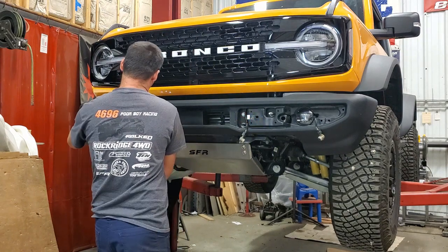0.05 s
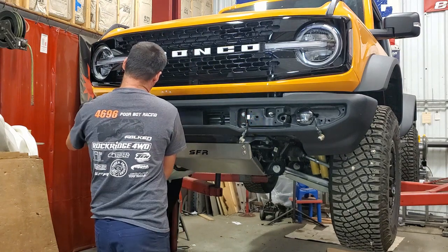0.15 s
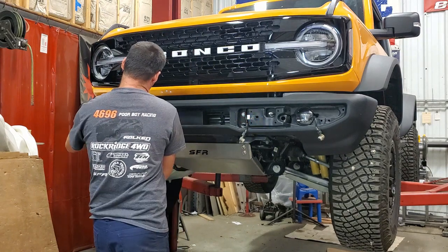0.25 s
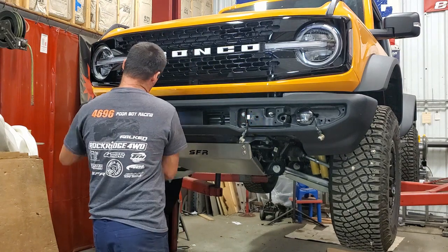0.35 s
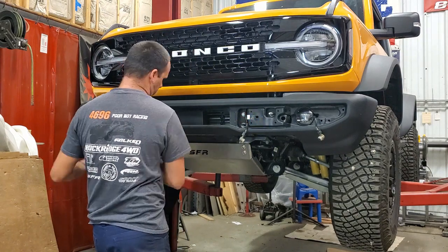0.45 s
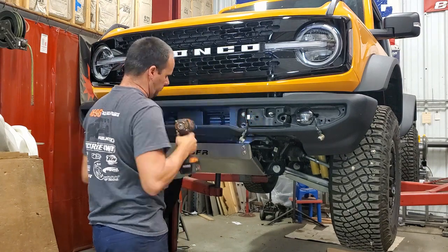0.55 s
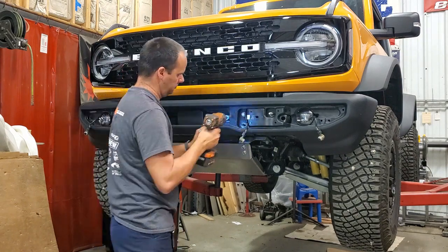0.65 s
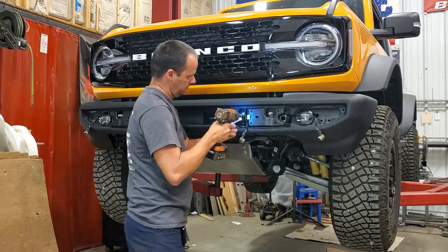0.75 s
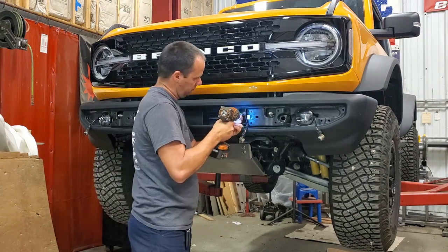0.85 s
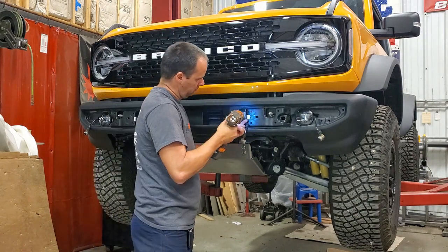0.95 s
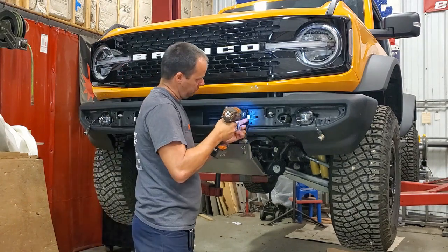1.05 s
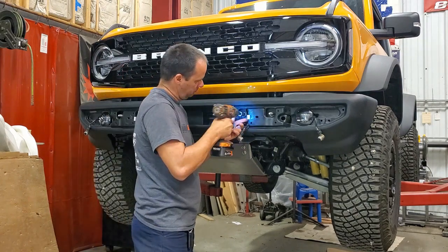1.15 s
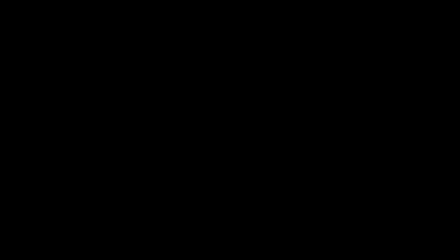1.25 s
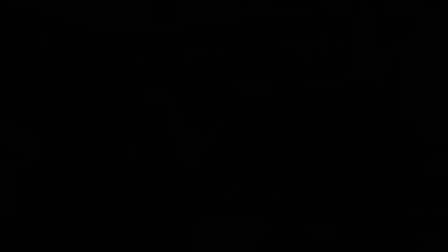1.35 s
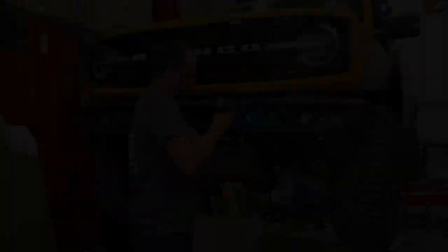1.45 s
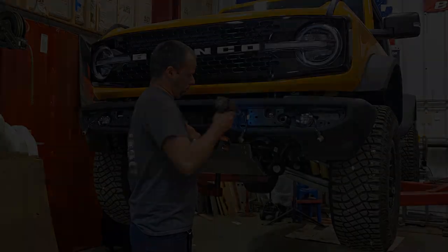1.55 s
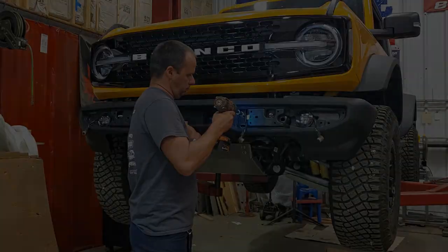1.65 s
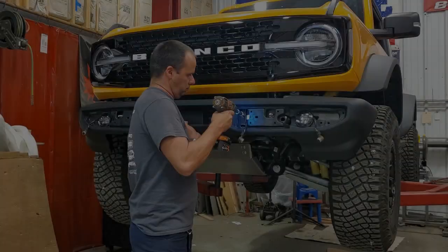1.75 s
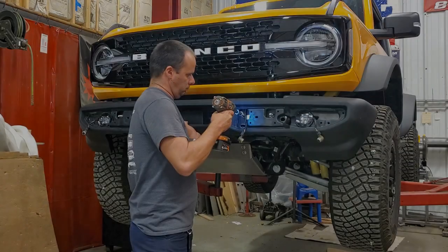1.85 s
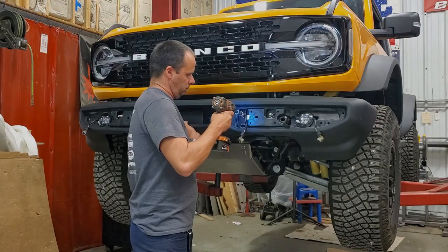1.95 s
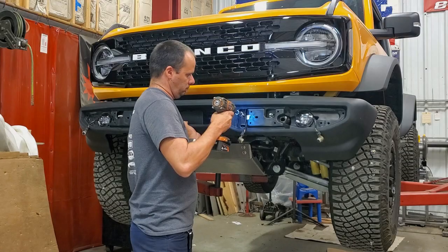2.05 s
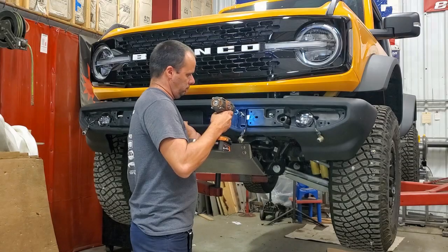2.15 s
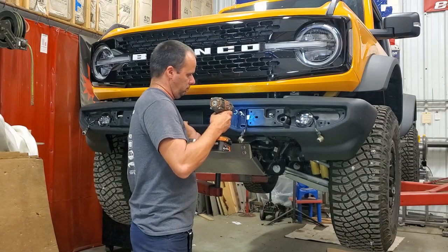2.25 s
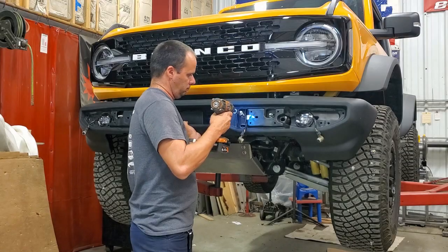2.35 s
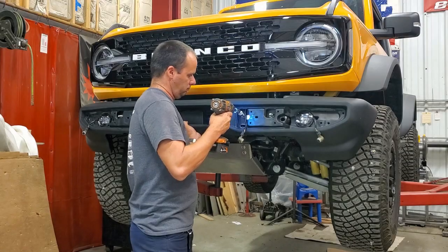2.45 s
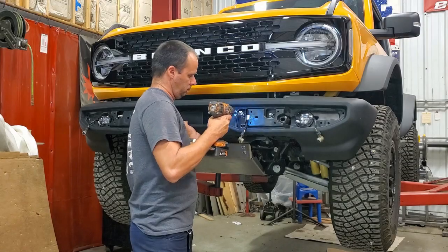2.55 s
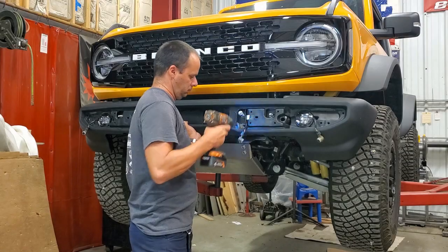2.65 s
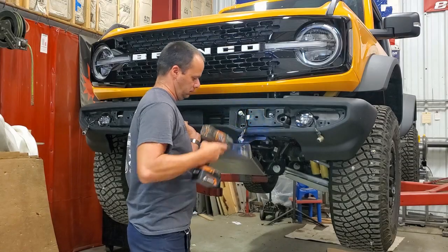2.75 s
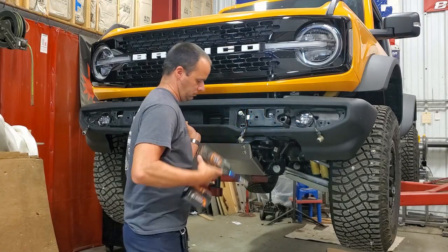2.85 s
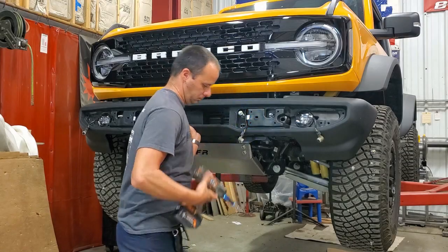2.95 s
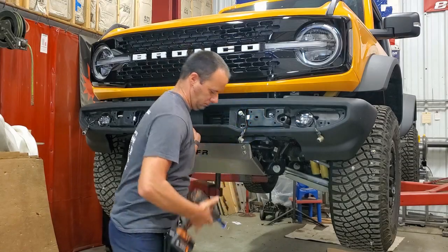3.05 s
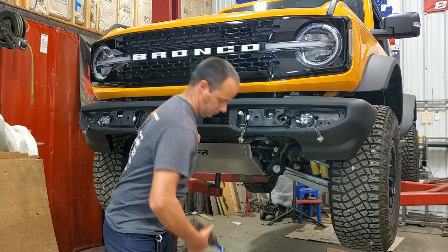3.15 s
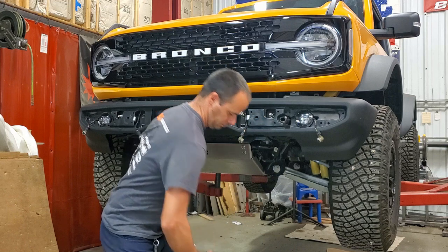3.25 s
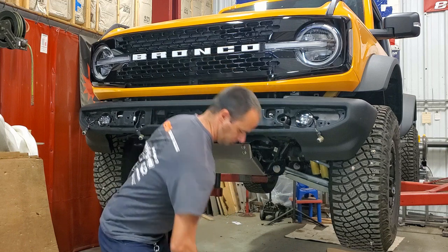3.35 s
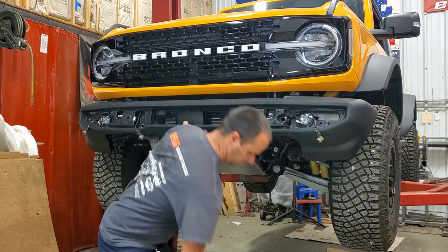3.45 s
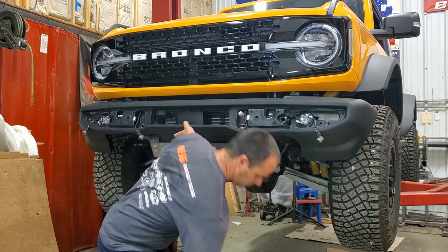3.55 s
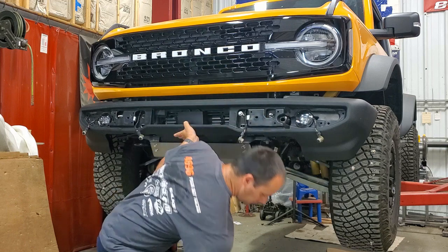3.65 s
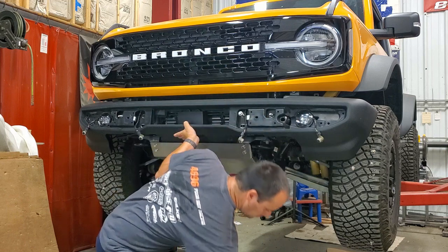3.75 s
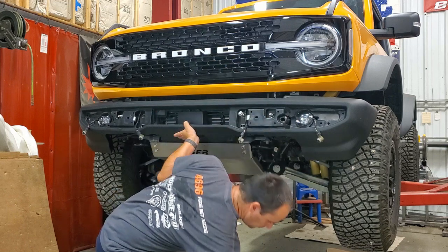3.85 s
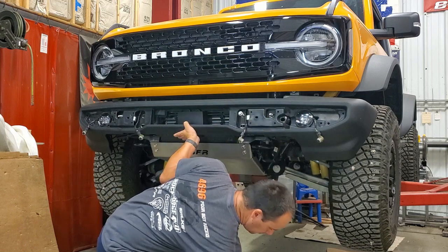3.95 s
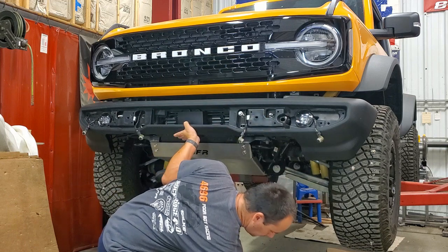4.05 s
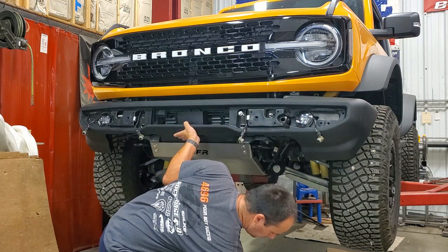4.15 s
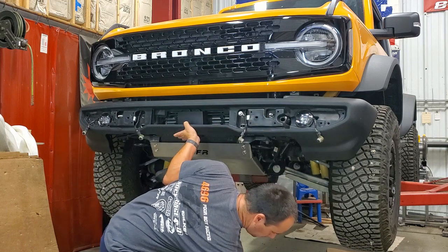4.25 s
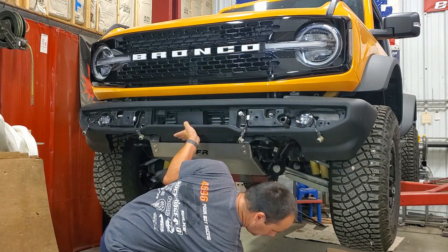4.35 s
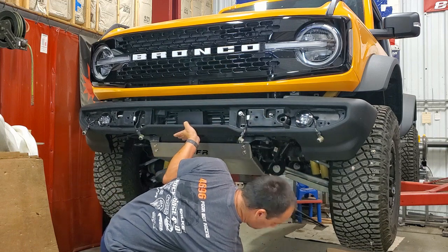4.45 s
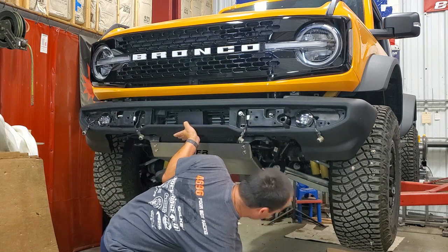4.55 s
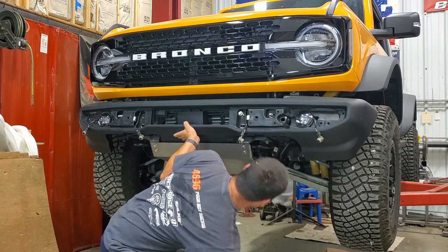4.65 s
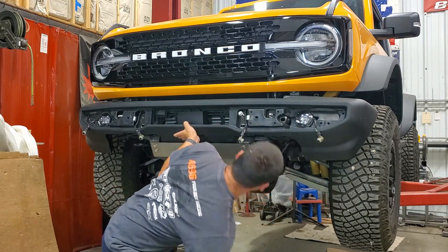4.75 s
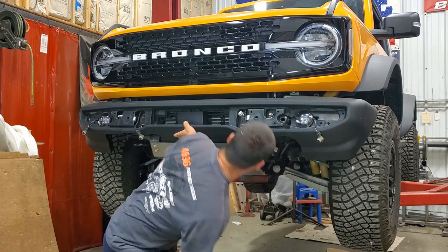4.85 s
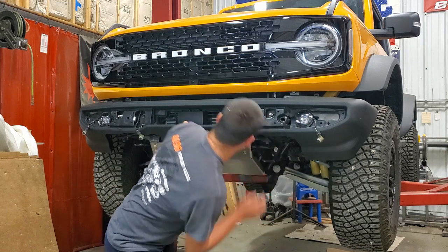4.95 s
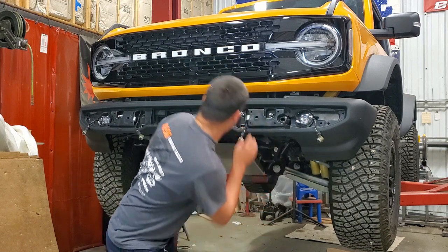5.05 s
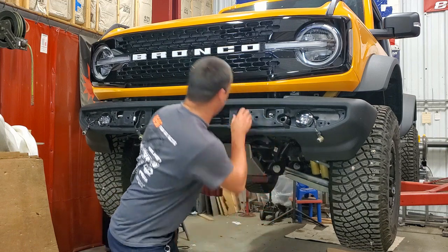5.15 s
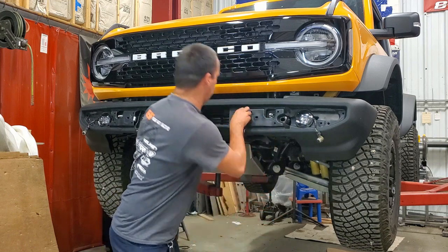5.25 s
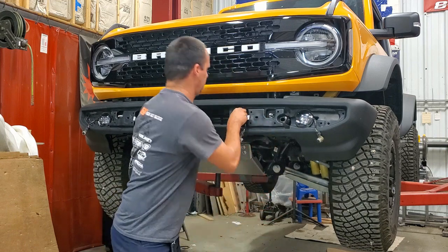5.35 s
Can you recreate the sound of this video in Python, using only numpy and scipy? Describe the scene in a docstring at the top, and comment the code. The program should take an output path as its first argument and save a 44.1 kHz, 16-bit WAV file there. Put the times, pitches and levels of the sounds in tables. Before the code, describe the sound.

Faint sped-up hisses and ticks, a brief silence, then a cordless driver whirs up, rattles, winds down with knocks, and is set down with a clank.

```python
"""A reverberant workshop in stereo: a cordless driver spins a bolt out of a truck bumper.
First comes fast-forwarded work, with noise swells as shrill hisses and contact showers as ticks, then a short
silence. Then the motor creeps, winds up and coasts down: sines whine with the gear speed, random contacts
rattle in metal resonances, and the loose bolt knocks. Something scrapes, and the tool is set down on the floor.
The room follows close on the direct sound; its echo differs between left and right."""
import sys
import numpy as np
from scipy import signal
from scipy.fft import rfft, irfft
from scipy.io import wavfile
from scipy.ndimage import uniform_filter1d

SR = 44100
rng = np.random.default_rng(int(sys.argv[2]) if len(sys.argv) > 2 else 0)


def dump_mix(stems):
    """Bounce the given channels to the path in sys.argv[1] as a 16-bit WAV at rate SR."""
    frames = np.atleast_2d(stems).T  # one column per channel
    limited = np.clip(frames, -1, 1)  # hard clip at full scale
    pcm = np.round(limited * 32767).astype(np.int16)
    wavfile.write(sys.argv[1], SR, pcm)


N = 238404
TIME = np.arange(N) / SR

# Levels are at the source, ahead of its colouring and the room.
# Colours are spectral shapes; colour() scales each to unit power.
FAST_END_S, SHOP_START_S = 1.231, 1.295  # silence in between

# fast-forwarded tool runs: start/s, swell/s, end/s, level/dB
FAST_RUNS = [(-.01, 0.0077, 0.024, -35), (0.094, 0.06, 0.17, -34), (.2, .02, .25, -59.5),
             (.249, .005, .305, -45), (.27, 0.057, 0.4, -40.5)]
FAST_FALL_DB_PER_S = 500
# faint handling between the ticks
FIDGET_S, FIDGET_DB, FIDGET_FADE_DB_PER_S = 0.606, -68.5, 30
# colour of the runs and handling: f/Hz, level/dB
FAST_COLOUR = [(240, -36), (400, -15.5), (504, -12), (676, -1), (789, -5), (1270, -1.5), (1440, -8),
               (1990, -3.5), (4580, -8.5), (13900, 1.5), (16000, -5.5)]
# fast-forwarded clatter, the loudest ticks: t/s, level/dB, treble/dB
FAST_TICKS = [(0.656, -57, 10), (.699, -55, -3), (0.798, -57, 21), (0.827, -48.5, -3), (0.847, -52.5, -22),
              (.929, -53.5, -21.5), (1.029, -57, -13), (1.093, -48.5, -10), (1.149, -50, -14),
              (1.198, -48, -20.5)]
FAST_TICK_T60_S = 0.15
# colour of the ticks: f/Hz, level/dB
FAST_TICK_COLOUR = [(530, -17), (900, -4), (1020, -4.5), (1550, -10), (1850, -2), (2170, -9.5),
                    (2600, -1.5), (3300, -9), (5160, -8), (5610, -6.5), (14200, 1.5), (16000, -6.5)]
# colour of the hum under the fast work: f/Hz, level/dB
FAST_HUM_COLOUR = [(30, -35.5), (90, -28), (130, -12), (180, -4.5), (280, 1), (400, -3), (540, -15),
                   (720, -17), (1400, -30), (2500, -38), (4500, -44)]
# course of that hum: t/s, level/dB
FAST_HUM_LEVEL = [(0, -66), (.18, -64), (.28, -54.5), (.42, -52), (.55, -57), (1.23, -56.5)]
# strikes of a bright clink: t/s, level/dB, T60/s, treble/dB
CLINK_BLOWS = [(.389, -33.5, .1, 0), (.396, -22, 0.1, 0), (.42, -46.5, 0.2, 0)]
# its ringing metal: f/Hz, width/Hz, gain/dB
CLINK_MODES = [(5920, 300, -8.5), (8500, 330, -5), (11250, 210, 6.5), (12000, 500, 0.5), (13640, 600, 0.5),
               (14140, 3700, -14)]

# low air rumble of the building: f/Hz, level/dB
RUMBLE_COLOUR = [(20, -30.5), (30, -18), (44, -9.5), (56, 4.5), (66, -2), (82, -9.5), (110, -17),
                 (150, -24.5), (240, -30), (360, -35.5), (500, -45.5), (800, -49.5), (2000, -58.5),
                 (16000, -70)]
# course of the rumble: t/s, level/dB
RUMBLE_LEVEL = [(1.3, -51), (2.2, -53.5), (2.85, -59), (4.45, -52.5), (5.4, -51)]
# colour of the faint hiss above it: f/Hz, level/dB
HISS_COLOUR = [(500, 4), (3000, -2.5), (6500, -1), (7500, -13), (11000, -2.5), (16000, -2)]

# speed control whistling at half trigger: start/s, swell/s, end/s, level/dB
WHISTLES = [(1.285, .01, 1.375, -44.5), (1.37, .02, 1.44, -53.5), (1.443, .012, 1.497, -42)]
WHISTLE_HZ, WHISTLE_FALL_DB_PER_S = 5810, 702

# trigger half pressed, pulled through, let go; at last the bolt's thread brakes the motor
PULL_S, LET_GO_S, BRAKE_S, STOP_S = 1.507, 1.745, 2.05, 2.38
CREEP_HZ, FULL_HZ = 1792, 5319  # nominal gear whine at half trigger and at full speed
SPIN_UP_S, COAST_S = .065, .72  # time constants of the rotor
TEETH = 16  # on the pinion
WHINE_DB, WHINE_DB_PER_DECADE = -31.5, 37.5  # at full speed; growth with speed
RATTLE_DB, RATTLE_DB_PER_DECADE = -23.5, 22  # likewise
JOLT_DB, JOLT_S = 7, 0.048  # extra rattle as the socket takes up the load; time constant
SURGE_DB, SURGE_TREBLE_DB = 5, 5  # scaled by torque: extra level in spin-up, extra sizzle
# gear and socket clatter: f/Hz, level/dB
RATTLE_COLOUR = [(90, -40), (150, -15), (190, -6.5), (300, -1), (400, -15), (500, -7.5), (1100, -8),
                 (2060, -5), (3300, -5.5), (4500, -12), (5600, -15.5), (6700, -15), (7500, -27),
                 (11000, -19), (16000, -24)]
# bumper and tool body: f/Hz, width/Hz, gain/dB
BODY_MODES = [(187, 21, 0), (283, 21, -1), (494.7, 26, 1.5), (658.7, 50, -5), (820, 33, -13),
              (1305, 66, -7.5), (1600, 87, -5), (2030, 66, -2.5), (2542, 26, -3), (3360, 350, -7.5)]
# gear housing, rung as the whine sweeps through: f/Hz, width/Hz, gain/dB
HOUSING_MODES = [(3700, 270, 1), (4190, 90, -1), (5036, 38, -0.5)]

# loose bolt jumping its last thread: t/s, level/dB, treble/dB
KNOCKS = [(2.009, -14.5, 4.5), (2.029, -21.5, -1), (2.045, -17.5, -3), (2.079, -14.5, -5),
          (2.117, -14.5, -0.5), (2.16, -17, -2.5), (2.207, -15.3, -1), (2.251, -18, 0.5), (2.296, -28, 15)]
KNOCK_T60_S = 0.076
# colour of the knocks: f/Hz, level/dB
KNOCK_COLOUR = [(71, -44.5), (120, -21), (188, -1), (290, -6), (390, -11.5), (493, -5), (557, -6.5),
                (1120, -10.5), (1290, -8.5), (3740, -11.5), (7350, -25), (12500, -24.5), (16000, -30)]

# hollow bumps of the tool's battery and the work: t/s, level/dB, T60/s
BUMPS = [(2.393, -35, .1), (2.428, -31, 0.16), (2.948, -61, .2), (3.461, -48.5, 0.08), (4.176, -28, 0.084),
         (4.237, -20, 0.036)]
# hollow ring of the plastic battery pack: f/Hz, width/Hz, gain/dB
BATTERY_MODES = [(96, 81, 1.5), (484, 180, -10.5), (628, 108, 6), (816, 200, -19)]

# tiny bright clicks: t/s, level/dB
CLICKS = [(2.241, -34), (3.086, -54.5), (4.176, -49), (4.249, -46), (4.318, -52.5), (4.445, -51)]
CLICK_T60_S = 0.03
# colour of the clicks: f/Hz, level/dB
CLICK_COLOUR = [(3000, -25), (6000, -2), (11000, 8), (16000, 1)]
# small metal taps, then the tool set down: t/s, level/dB, treble/dB
TAPS = [(2.876, -72, 4), (3.372, -52, 15), (3.397, -46, 14), (3.425, -56, -9), (4.170, -24.5, 4),
        (4.1745, -22, 6.5)]
TAP_T60_S = 0.016
# colour of taps and bounces: f/Hz, level/dB
TAP_COLOUR = [(35, -55), (60, 8), (108, 2.5), (238, -13.5), (417, -2), (666, -17), (862, -14), (946, -14),
              (1040, -3.5), (1470, -1), (1580, -7), (2520, 1), (7750, -28), (13000, -27), (16000, -28)]
# things slid about: start/s, swell/s, end/s, level/dB, treble/dB
SCRAPES = [(3.089, 0.041, 3.173, -46, -11.5), (3.08, 0.032, 3.224, -52.5, 6), (3.5, 0.043, 3.45, -74, 8),
           (3.2, 0.037, 4.0, -85.5, 12), (3.6, 0.13, 3.73, -71.5, 14.5)]
SCRAPE_FALL_DB_PER_S = 450
# colour of the scrapes: f/Hz, level/dB
SCRAPE_COLOUR = [(120, -47), (200, -19.5), (448, -7.5), (509, -5.5), (806, -7), (1140, -7), (1300, -4),
                 (2290, -6.5), (2510, -5.5), (5940, -11), (7410, -19.5), (11700, -19.5), (16000, -27)]
# soft squeak: t/s, level/dB, T60/s, treble/dB
SQUEAK_BLOWS = [(4.125, -53.5, 0.17, 0)]
# its resonance: f/Hz, width/Hz, gain/dB
SQUEAK_MODES = [(2170, 520, 0.0018)]
# the socket landing: t/s, level/dB, T60/s, treble/dB
CLANK_BLOWS = [(4.1748, -14, 0.014, 0)]
# its metal: f/Hz, width/Hz, gain/dB
CLANK_MODES = [(1520, 64, -1), (2600, 68, -1), (3060, 150, -17), (3850, 300, -3), (4140, 220, -5.5)]
# the tool rocks to rest in ever weaker, brighter bounces
BOUNCE_S, BOUNCE_GAP_S, BOUNCE_T60_S = 4.182, .023, .11
BOUNCE_DB, BOUNCE_LOSS_DB = -36.5, 3.0  # first bounce; loss with each further one
BOUNCE_TREBLE_DB, BOUNCE_BRIGHTER_DB = 5, 2  # first bounce; gain with each further one

# decay of the room: f/Hz, T60/s
SHOP_T60 = [(100, .6), (500, 0.36), (2000, 0.43), (5000, 0.61), (14000, 0.35)]
# left-right correlation of the room: f/Hz, correlation
LIKENESS = [(100, 1), (300, .9), (600, 1), (1200, 0), (2500, 0.26), (5000, 0.079), (14000, 0)]
# stereo balance of the shop's sources: f/Hz, left minus right/dB
BALANCE = [(60, -2.5), (500, 1.5), (2000, 4), (5000, 0.5), (6800, 6), (8500, 5.5), (15000, 13.5)]
CUTOFF_HZ = 15900


def from_db(db):
    """Decibels to gain."""
    return 10 ** (np.asarray(db) / 20)


def rms_one(x):
    """Scale to rms 1."""
    return x / np.sqrt(np.mean(x ** 2) + 1e-20)


def in_time(rows):
    """Each column of a curve, sample by sample."""
    s, *columns = np.transpose(rows)
    return [np.interp(TIME, s, column) for column in columns]


def at_hz(points, hz):
    """Read a table on a log-frequency axis."""
    table_hz, values = np.transpose(points)
    return np.interp(np.log(hz + 1e-9), np.log(table_hz), values)


def convolve(x, response):
    """Pass a sound through an impulse response."""
    return signal.fftconvolve(np.atleast_2d(x), np.atleast_2d(response), axes=1)[:, :N]


def colour(x, spectrum, size=8192):
    """Causal minimum-phase filter of the given spectral shape; white noise keeps its power."""
    gain = from_db(at_hz(spectrum, np.linspace(0, SR / 2, size // 2 + 1)))
    cepstrum = irfft(np.log(rms_one(gain)))[:size // 2]
    cepstrum[1:] *= 2  # fold onto positive time: minimum phase
    return convolve(x, irfft(np.exp(rfft(cepstrum, size))))


def resonate(x, modes):
    """Parallel resonances, each with its dB as the gain at its peak."""
    out = 0
    for hz, width, db in modes:
        b, a = signal.iirpeak(hz, hz / width, fs=SR)
        out = out + from_db(db) * signal.lfilter(b, a, x + 1e-18)
    return out


def tilt(x, treble_db, split_hz=1800):
    """See-saw the treble against the bass."""
    b, a = signal.butter(1, split_hz, fs=SR)
    bass = signal.lfilter(b, a, x + 1e-18)
    return bass * from_db(-treble_db / 2) + (x - bass) * from_db(treble_db / 2)


def waver(size):
    """Noise smoothed over size samples; rms 1."""
    return rms_one(uniform_filter1d(rng.standard_normal(N), size=size))


def grains(per_s, spread_db):
    """Random tiny contacts of uneven size; rms 1."""
    size_db = spread_db * np.clip(rng.standard_normal(N), -2, 2)
    sizes = from_db(size_db) * rng.choice([-1, 1], N)
    return rms_one(sizes * (rng.random(N) < per_s / SR))


def blows(rows, per_s, spread_db, rise_s=0.00022):
    """Each blow is a shower of contacts, rising 20 dB per rise_s and dying 60 dB in its T60."""
    shower, out = grains(per_s, spread_db), 0
    for s, db, t60, treble_db in rows:
        fall_db = np.maximum(60 * (TIME - s) / t60, 20 * (s - TIME) / rise_s)
        out = out + tilt(shower * from_db(db - np.minimum(fall_db, 200)), treble_db)
    return out


def stroke(start, swell_s, end, db, fall_db_per_s):
    """Gain that swells smoothly from its start and falls at a steady dB rate from its end."""
    progress = np.clip((TIME - start) / max(swell_s, 1e-4), 0, 1)
    swell = np.sin(np.pi / 2 * progress) ** 2
    return swell * from_db(db - np.clip(fall_db_per_s * (TIME - end), 0, 200))


def pair(mid, side, alike):
    """Two unrelated signals of equal power become left and right with a given correlation."""
    alike = np.clip(alike, -1, 1)
    return np.sqrt((1 + alike) / 2) * mid + np.sqrt((1 - alike) / 2) * side * np.array([[1], [-1]])


def fast_forward():
    """Sped-up work: tool runs become hisses, clatter becomes ticks, the shop's rumble a hum."""
    runs = [stroke(*run, FAST_FALL_DB_PER_S) for run in FAST_RUNS]
    fidget = stroke(FIDGET_S, .02, FIDGET_S, FIDGET_DB, FIDGET_FADE_DB_PER_S)
    fidget = fidget * from_db(4.7 * waver(size=900))
    level = np.linalg.norm(runs + [fidget], axis=0)
    tick_rows = [(s, db, FAST_TICK_T60_S, treble_db) for s, db, treble_db in FAST_TICKS]

    def hiss_and_ticks():
        """One independent channel of noise swells and contact showers."""
        hiss = colour(level * grains(20000, 4.07), FAST_COLOUR)
        return hiss + colour(blows(tick_rows, 9000, 6.0, rise_s=0.0052), FAST_TICK_COLOUR)

    mid, side = hiss_and_ticks(), hiss_and_ticks()
    clink = resonate(blows(CLINK_BLOWS, 17000, 2.2, rise_s=0.0027), CLINK_MODES)
    hum = from_db(in_time(FAST_HUM_LEVEL)[0]) * colour(rng.standard_normal(N), FAST_HUM_COLOUR)
    width = resonate(side, [(4420, 3300, 2.6)])  # stereo width centres on one broad band
    return (pair(mid, width, 0.38) + clink + hum) * from_db([[1.3], [-1.3]])


def whistle():
    """The motor's windings sing at the switching rate of the speed control: a wavering sine."""
    level = sum(stroke(*row, WHISTLE_FALL_DB_PER_S) for row in WHISTLES)
    return level * from_db(2.0 * waver(size=300)) * np.sin(2 * np.pi * WHISTLE_HZ * TIME)


def rumble():
    """Low air rumble of the building, nearly alike left and right, under a faint wide hiss."""
    mid, side = rng.standard_normal((2, N))
    hiss = from_db(-78) * colour(rng.standard_normal((2, N)), HISS_COLOUR)
    low = from_db(in_time(RUMBLE_LEVEL)[0]) * colour(pair(mid, side, 0.91), RUMBLE_COLOUR)
    return low * from_db([[1.1], [-1.1]]) + hiss


def motor_speed():
    """Share of full speed: the rotor creeps, spins up, coasts and is braked to a stop."""
    pulled_s = np.clip(TIME, PULL_S, LET_GO_S) - PULL_S
    driven = 1 - (1 - CREEP_HZ / FULL_HZ) * np.exp(-pulled_s / SPIN_UP_S)
    coasting = np.exp(-np.maximum(TIME - LET_GO_S, 0) / COAST_S)
    braking = np.clip((STOP_S - TIME) / (STOP_S - BRAKE_S), 1e-6, 1)
    return driven * coasting * braking


def driver():
    """Rotor hum, gear-tooth whine and clatter in step with each turn; whine and clatter grow with speed."""
    speed = motor_speed()
    torque = (1 - speed) * (TIME < LET_GO_S)
    surge_db = SURGE_DB * uniform_filter1d(torque * (TIME > PULL_S), size=1500)
    jolt_db = JOLT_DB * np.exp(-np.maximum(TIME - SHOP_START_S, 0) / JOLT_S)
    whine_db = WHINE_DB + WHINE_DB_PER_DECADE * np.log10(speed) + surge_db
    rattle_db = RATTLE_DB + RATTLE_DB_PER_DECADE * np.log10(speed) + jolt_db + surge_db

    mesh_hz = FULL_HZ * speed * (1 + .005 * waver(size=100))
    turns = np.cumsum(mesh_hz) / (TEETH * SR)
    angle = 2 * np.pi * turns
    # a slightly eccentric pinion puts a faint line on either side of the whine
    mesh = np.sin(TEETH * angle) * (1 + 0.26 * np.sin(angle))
    mesh = mesh + from_db(-26) * np.sin(2 * TEETH * angle)
    rotor_hum = from_db(-9.5) * np.sin(angle)
    whine = (mesh + rotor_hum) * from_db(whine_db + 2.5 * waver(size=450))

    # one slap per turn, of random sign
    slaps = rms_one(np.diff(np.floor(turns), prepend=0) * rng.choice([-1, 1], N))
    clatter = grains(10000, 2.5) * (1 + 0.51 * np.sin(angle))
    contacts = from_db(rattle_db) * (0.81 * clatter + 0.22 * slaps)
    # faster parts hit harder, so the clatter brightens with speed; gears under torque sizzle
    contacts = tilt(contacts, treble_db=10.0 * (speed - 0.83), split_hz=1800)
    contacts = tilt(contacts, treble_db=SURGE_TREBLE_DB * torque, split_hz=5000)
    rattle = colour(contacts, RATTLE_COLOUR) + from_db(1.5) * resonate(contacts, BODY_MODES)
    return from_db(-2.0) * rattle, whine + resonate(whine, HOUSING_MODES)


def bolt():
    """The free bolt knocks on the bumper: short contact showers ring the metal body."""
    rows = [(s, db, KNOCK_T60_S, treble_db) for s, db, treble_db in KNOCKS]
    knocks = blows(rows, 9000, 1.4, rise_s=0.00061)
    return from_db(-4.5) * colour(knocks, KNOCK_COLOUR) + from_db(3.0) * resonate(knocks, BODY_MODES)


def battery_bumps():
    """Contact showers excite the hollow resonances of the plastic battery pack."""
    rows = [(s, db, t60, 0) for s, db, t60 in BUMPS]
    return resonate(blows(rows, 15000, 0.46), BATTERY_MODES)


def bounces(count):
    """Blows of the tool rocking to rest, evenly spaced, each weaker and brighter."""
    return [(BOUNCE_S + k * BOUNCE_GAP_S, BOUNCE_DB - k * BOUNCE_LOSS_DB, BOUNCE_T60_S,
             BOUNCE_TREBLE_DB + k * BOUNCE_BRIGHTER_DB) for k in range(count)]


def handling():
    """Clicks, taps and sliding friction; something squeaks softly, then the tool lands with a clank."""
    click_rows = [(s, db, CLICK_T60_S, 0) for s, db in CLICKS]
    clicks = colour(blows(click_rows, 16000, 0.99), CLICK_COLOUR)

    tap_rows = [(s, db, TAP_T60_S, treble_db) for s, db, treble_db in TAPS]
    taps = colour(blows(tap_rows + bounces(count=6), 12000, 0.99), TAP_COLOUR)

    friction, slides = grains(9000, 4.7), 0
    for *shape, treble_db in SCRAPES:
        slides = slides + tilt(friction * stroke(*shape, SCRAPE_FALL_DB_PER_S), treble_db)
    scrape = colour(slides, SCRAPE_COLOUR)

    squeak = resonate(blows(SQUEAK_BLOWS, 8000, 1.5, rise_s=0.094), SQUEAK_MODES)
    landing = blows(CLANK_BLOWS, 20000, 1.3)
    rocking = from_db(8.5) * blows(bounces(count=6), 12000, 0.99)
    clank = resonate(landing + rocking, CLANK_MODES)
    return scrape + squeak + clank + clicks + taps


def shop_tail(build_s=0.0017):
    """Diffuse echo of the hall: noise that builds up and dies band by band, unlike left and right."""
    t = TIME[:SR]
    white, tail = rng.standard_normal((2, 2, SR)), 0
    edges = np.geomspace(40, 18000, 14)
    for k, (low, high) in enumerate(zip(edges, edges[1:])):
        band = signal.butter(2, [low, high], "band", fs=SR, output="sos")
        mid, side = signal.sosfilt(band, white[k % 2])  # neighbouring bands use separate noise
        hz = np.sqrt(low * high)
        fade = from_db(-60 * t / at_hz(SHOP_T60, hz)) * (1 - np.exp(-t / build_s))
        tail = tail + pair(mid, side, at_hz(LIKENESS, hz)) * fade / np.linalg.norm(fade)
    return tail


def workshop(x, tail, direct_db, echo_db):
    """Direct sound plus the hall's echo; the treble favours the left."""
    response = from_db(direct_db) + from_db(echo_db) * rfft(tail, 2 * SR)
    lean_db = at_hz(BALANCE, np.linspace(0, SR / 2, SR + 1)) / 2
    return convolve(x, irfft(response * from_db([lean_db, -lean_db]))[:, :SR])


def scene():
    """Fast-forwarded work, a moment of silence, then the shop at its own pace."""
    tail = shop_tail()
    rattle, whine = driver()
    shop = workshop(rattle, tail, direct_db=-4.5, echo_db=-1.0)
    shop += workshop(whine + whistle(), tail, direct_db=-2, echo_db=-3)
    shop += workshop(bolt(), tail, direct_db=-3.0, echo_db=-1.0)
    shop += workshop(battery_bumps(), tail, direct_db=-2.0, echo_db=-4)
    shop += workshop(handling(), tail, direct_db=-5.0, echo_db=-1.5)
    shop += rumble()
    return fast_forward() * (TIME < FAST_END_S) + shop * (TIME >= SHOP_START_S)


def record(dry):
    """A steep elliptic low-pass cuts the top."""
    low_pass = signal.ellip(12, .1, 80, CUTOFF_HZ, fs=SR, output="sos")
    return signal.sosfilt(low_pass, dry)


dry = scene()
out = record(dry)
dump_mix(out)
```